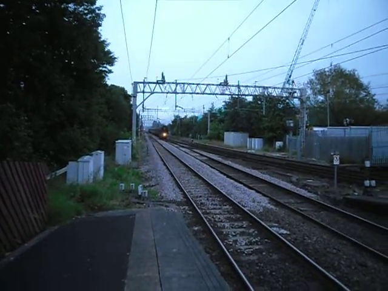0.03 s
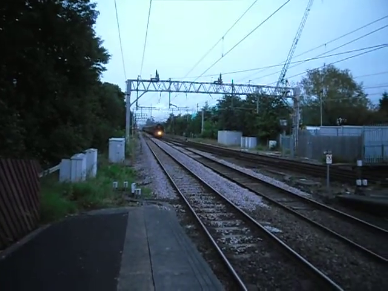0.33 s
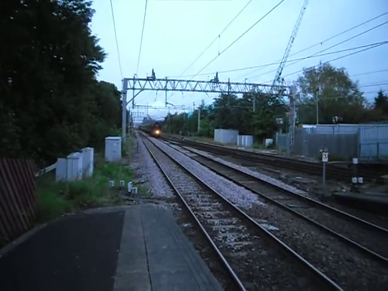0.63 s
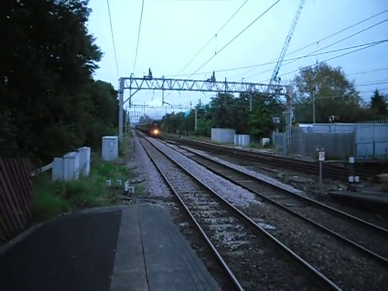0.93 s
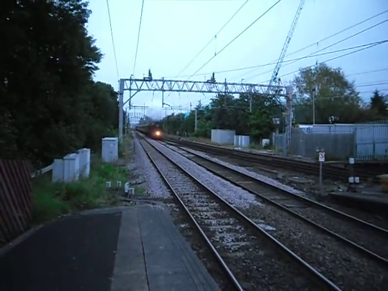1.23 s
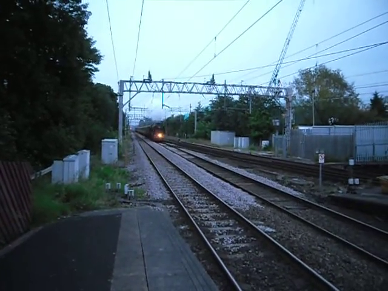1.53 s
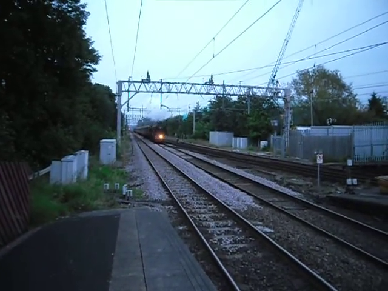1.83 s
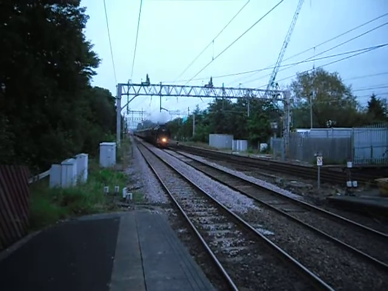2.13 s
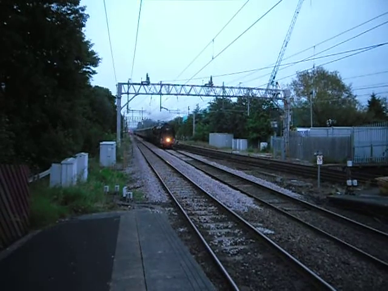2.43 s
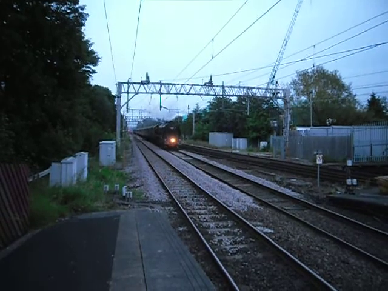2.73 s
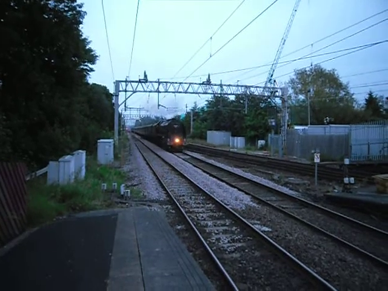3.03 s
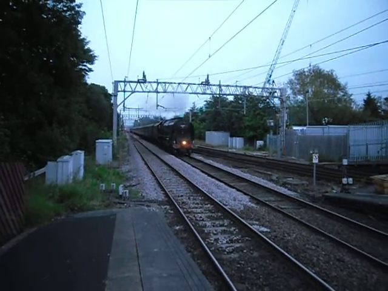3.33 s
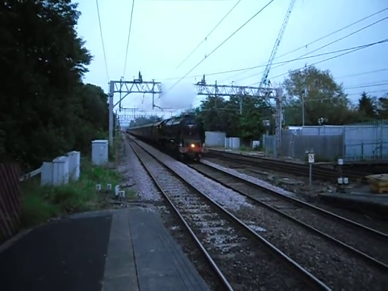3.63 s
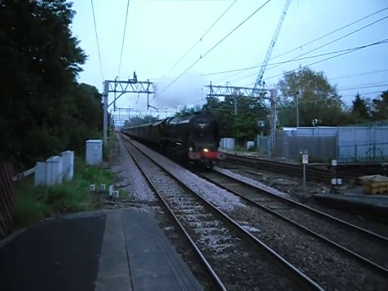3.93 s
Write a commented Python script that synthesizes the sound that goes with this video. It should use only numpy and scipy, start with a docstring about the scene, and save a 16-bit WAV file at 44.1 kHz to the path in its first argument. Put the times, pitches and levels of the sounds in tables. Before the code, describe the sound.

A steam train runs fast towards a microphone on a station platform. Rapid, thudding chuffs with spits of steam grow louder over rumbling wheels and rushing rails. A rail pings once, and two harder beats bark near the end.

```python
"""A steam locomotive runs fast towards a microphone on a station platform, beating twelve times a second.
Each exhaust beat is a push of air, a low thud, a chuff that rings in the chimney and smokebox, and a
spit of steam; trees and fences along the line scatter it into a short tail. Under the beats the wheels
rumble and the rails rush and sing, louder and brighter as the train closes in. A rail pings once,
and at close range two beats bark harder. A low rumble and a faint whine lie behind it all."""
import sys
import numpy as np
from scipy import signal
from scipy.fft import rfft, irfft, next_fast_len
from scipy.io import wavfile
from scipy.ndimage import uniform_filter1d, map_coordinates

SR = 44100
rng = np.random.default_rng(int(sys.argv[2]) if len(sys.argv) > 2 else 0)


def to_wav(sig):
    """Store sig (one row per channel, or 1-D mono) as 16-bit WAV at the path in sys.argv[1].

    Samples outside -1..1 are clipped; the rate is SR.
    """
    pcm = np.clip(np.atleast_2d(sig), -1, 1) * 32767
    pcm = np.round(pcm).astype(np.int16)
    wavfile.write(sys.argv[1], SR, pcm.T)  # frames by channels


N = 176400
TIME = np.arange(N) / SR


def amp(db):
    """Decibels to gain."""
    return 10 ** (np.asarray(db) / 20)


def unit(x):
    """Scale to rms 1."""
    return x / np.sqrt(np.mean(x ** 2) + 1e-20)


def along(points, hz):
    """Interpolate (frequency [Hz], value) points on a log axis."""
    f, v = np.transpose(points)
    return np.interp(np.log(hz + 1), np.log(f + 1), v)


def level(rows):
    """Gain per sample from (time [s], level [dB]) points."""
    return amp(np.interp(TIME, *np.transpose(rows)))


def wobble(rate):
    """A smooth random curve, rate knots a second."""
    return map_coordinates(rng.standard_normal(1024), [TIME * rate], mode="mirror")


def filtered(x, response):
    """Filter x by a complex response of frequency."""
    m = next_fast_len(N + SR // 2)
    return irfft(rfft(x, m) * response(np.fft.rfftfreq(m, 1 / SR)), m)[:N]


def noise(spectrum, patchy_db):
    """Coloured noise of rms 1 with patches of random gain."""
    z = signal.stft(rng.standard_normal(N), nperseg=1024)[2]
    patches = uniform_filter1d(uniform_filter1d(rng.standard_normal(z.shape), 3, 0), 12, 1)
    patched = signal.istft(z * amp(patchy_db * unit(patches)), nperseg=1024)[1][:N]
    return unit(filtered(patched, lambda hz: amp(along(spectrum, hz))))


def resonances(modes, hz):
    """Response of (frequency [Hz], width [Hz], gain [dB]) resonances."""
    return sum(amp(db) * 1j * hz * w / (c * c - hz * hz + 1j * hz * w) for c, w, db in modes)


def ringing(drive, modes, low_hz, high_hz):
    """Resonances excited by drive, through a steep band-pass, at rms 1."""
    def response(hz):
        band = hz ** 4 / (hz ** 4 + low_hz ** 4) / (1 + (hz / high_hz) ** 4)
        return resonances(modes, hz) * band
    return unit(filtered(drive, response))


def burst(t, attack_s, hold_s, decay_s):
    """Smooth rise, hold and exponential release."""
    rise = np.sin(np.pi / 2 * np.clip(t / attack_s, 0, 1)) ** 2
    return rise * np.exp(-np.maximum(t - attack_s - hold_s, 0) / decay_s)


# Ambience on the platform: (frequency [Hz], relative level [dB])
STATION_SPECTRUM = [(20, -0.5), (45, 1), (70, -1.5), (100, -23.5), (200, -42)]
def station_rumble(level_db=-37.5):
    """A soft, steady low rumble all around the microphone."""
    return amp(level_db) * noise(STATION_SPECTRUM, patchy_db=1)


# Tones far in the background: (frequency [Hz], level [dB])
WHINE_TONES = [(7867, -77), (8133, -79)]
def whine():
    """Two faint, steady high tones."""
    return sum(amp(db) * np.sqrt(2) * np.sin(2 * np.pi * hz * TIME) for hz, db in WHINE_TONES)


# Ring of a pinging rail: (frequency [Hz], width [Hz], gain [dB])
PING_MODES = [(1950, 74, 2), (2250, 80, -13), (2720, 240, 1)]
# The ping, heard from the platform: (time [s], level [dB])
RAIL_PINGS = [(1.871, -33)]
def rail_ping():
    """A rail pings once, brief and metallic."""
    steel = ringing(rng.standard_normal(N), PING_MODES, low_hz=1100, high_hz=3500)
    return steel * sum(amp(db) * burst(TIME - start, attack_s=.0067, hold_s=.013, decay_s=.0082)
                       for start, db in RAIL_PINGS)


# Rails ahead of the train: (frequency [Hz], width [Hz], gain [dB])
SONG_MODES = [(1535, 92, -2.5), (1900, 99, -11), (2350, 97, -4.5), (2655, 79, -4), (2940, 99, -6)]
# Their singing, heard from the platform: (time [s], level [dB])
SONG_LEVELS = [(0, -49), (.6, -45), (1.2, -43), (2, -42.5), (3, -36), (4, -46.5)]
def rail_song():
    """The rails ring in a few narrow bands under the wheels."""
    steel = ringing(rng.standard_normal(N), SONG_MODES, low_hz=1100, high_hz=3500)
    return level(SONG_LEVELS) * steel * amp(wobble(8.5))


# Rush of the rails: (frequency [Hz], relative level [dB])
RUSH_SPECTRUM = [(300, 5), (900, 6.5), (1300, -1.5), (1750, 0), (2200, -2), (2800, -3.5), (3600, -6.5),
                 (5000, -9), (6000, -13.5), (6700, -19), (7500, -19.5), (8100, -44.5), (8800, -59)]
# Its approach: (time [s], level [dB])
RUSH_LEVELS = [(0, -40), (.6, -39.5), (1.4, -37.5), (2.2, -34), (2.75, -33), (3.2, -26), (3.45, -27),
               (3.85, -25), (4, -24.5)]
def rail_rush(treble_hz=3600, brighten_db_per_s=.8):
    """The rails rush; the air swallows less treble as the distance to the microphone shrinks."""
    rush = level(RUSH_LEVELS) * noise(RUSH_SPECTRUM, patchy_db=.8) * amp(.7 * wobble(20))
    treble = filtered(rush, lambda hz: hz ** 4 / (hz ** 4 + treble_hz ** 4))
    treble_gain = amp(brighten_db_per_s * (TIME - N / SR / 2))
    return rush + treble * (treble_gain - 1)


# Roar of the track: (frequency [Hz], relative level [dB])
ROAR_SPECTRUM = [(120, -12), (250, 12), (330, 4.5), (480, 11), (560, 6.5), (750, 0.5), (950, 2.5),
                 (1300, -8.5), (2500, -68)]
# Hollow ring of wheels on track: (frequency [Hz], width [Hz], gain [dB])
HOLLOW_MODES = [(406, 10, -4), (467.6, 54, 7.5), (508, 48, -10.5)]
# Roar and hollow ring at the platform: (time [s], level [dB])
ROAR_LEVELS = [(0, -38.5), (1, -34.5), (2, -31), (2.7, -29), (3.1, -27), (3.5, -23), (4, -23)]
HOLLOW_LEVELS = [(0, -49.5), (2.2, -46), (2.9, -32), (3.35, -23), (3.7, -28.5), (4, -33.5)]
def track_roar():
    """The track roars under the wheels and rings hollow at close range."""
    roar = level(ROAR_LEVELS) * noise(ROAR_SPECTRUM, patchy_db=1.9) * amp(.71 * wobble(26))
    hollow = ringing(rng.standard_normal(N), HOLLOW_MODES, low_hz=300, high_hz=704)
    return roar + level(HOLLOW_LEVELS) * hollow


# Rumble of the wheels: (frequency [Hz], relative level [dB])
WHEEL_SPECTRUM = [(25, 2), (45, -0.5), (65, -4.5), (100, -9.5), (138, 3.5), (185, -2.5), (215, 0.5),
                  (250, 2.5), (325, -6.5), (600, -51)]
# From far to near: (time [s], level [dB])
WHEEL_LEVELS = [(0, -41), (.8, -37.5), (1.4, -42), (2.1, -33.5), (2.55, -25.5), (2.8, -26), (3.1, -21),
                (3.55, -19.5), (4, -23.5)]
def wheel_rumble():
    """Wheels roll on the rails with a low, unsteady rumble."""
    return level(WHEEL_LEVELS) * noise(WHEEL_SPECTRUM, patchy_db=2.95) * amp(.8 * wobble(7.3))


# Echo beside the line: (frequency [Hz], time to fall 60 dB [s])
LINESIDE_DECAY = [(200, 0.99), (2000, 0.75), (8000, 0.097)]
def lineside_echo(exhaust):
    """Trees and fences scatter the exhaust back to the microphone as a short tail."""
    hz, t, z = signal.stft(rng.standard_normal(SR // 2), SR, nperseg=256)
    decay = amp(-60 * t / along(LINESIDE_DECAY, hz)[:, None])
    tail = signal.istft(z * decay, SR, nperseg=256)[1]
    return signal.fftconvolve(exhaust, tail / np.linalg.norm(tail))[:N]


# The four beats in one turn of the wheels: (push accent [dB], chuff accent [dB])
TURN_ACCENTS = [(0.4, 0.17), (1, -1.2), (4, -1.55), (1.5, -0.4)]
PUSH_ACCENTS, CHUFF_ACCENTS = np.transpose(TURN_ACCENTS)
def beats(scatter_db, accents_db=0, first_s=.0175, spacing_s=.081856, quicken_s=9.57e-6):
    """One impulse per exhaust beat, quickening slightly; any accents repeat with the wheel turn."""
    k = np.arange(int(N / SR / spacing_s) + 1)
    times = first_s + spacing_s * k - quicken_s * k ** 2
    gains = amp(np.resize(accents_db, len(k)) + scatter_db * rng.standard_normal(len(k)))
    return np.bincount(np.round(times * SR).astype(int), gains, N)[:N]


def pulses(hits, delay_s, width_s):
    """Lay a bell-shaped pulse on every beat."""
    t = np.arange(-SR // 2, SR // 2 + 1) / SR
    return signal.fftconvolve(hits, np.exp(-.5 * ((t - delay_s) / width_s) ** 2), "same")


def puffs(hits, lead_s, attack_s, hold_s, decay_s):
    """Lay a burst of flow on every beat, opening lead_s ahead of it."""
    t = np.arange(-SR // 2, SR // 2 + 1) / SR
    return signal.fftconvolve(hits, burst(t + lead_s, attack_s, hold_s, decay_s), "same")


# Low body of a beat: (frequency [Hz], relative level [dB])
THUD_SPECTRUM = [(95, -24.5), (135, 4.5), (178, 13), (210, 0), (260, -34.5)]
# Its weight at the platform: (time [s], level [dB])
THUD_LEVELS = [(0, -53), (.6, -47), (1.3, -39), (1.65, -37), (2.2, -33), (2.65, -30.5), (3.05, -35),
               (3.55, -27), (4, -29)]
def thuds():
    """The low body of each beat fills out as the engine nears."""
    flow = puffs(beats(scatter_db=3), lead_s=.0051, attack_s=.013, hold_s=.01, decay_s=.032)
    return level(THUD_LEVELS) * unit(flow * noise(THUD_SPECTRUM, patchy_db=.8))


# Hiss of steam: (frequency [Hz], relative level [dB])
SPIT_SPECTRUM = [(400, -28), (1000, 1), (1550, 2), (1900, -0.5), (2700, 5), (3600, -4.5), (4750, -5),
                 (6300, -11.5), (7500, -29), (8700, -43)]
# From far to near: (time [s], level [dB])
SPIT_LEVELS = [(0, -47), (.5, -42.5), (1.5, -42.5), (2.5, -39), (3.2, -39), (4, -33.5)]
def steam_spit():
    """A spit of steam rides on each chuff."""
    flow = puffs(beats(scatter_db=1.4), lead_s=.0053, attack_s=.013, hold_s=.013, decay_s=.023)
    return level(SPIT_LEVELS) * unit(flow * noise(SPIT_SPECTRUM, patchy_db=2))


# Blast of a hard beat: (frequency [Hz], relative level [dB])
BARK_SPECTRUM = [(100, -3.5), (160, -28), (330, -1.5), (520, 6), (800, 4), (1150, -8), (1500, -20),
                 (2000, -6), (3000, -18.5), (5500, -19), (8500, -45.5)]
# Its metallic ring: (frequency [Hz], width [Hz], gain [dB])
BARK_RING_MODES = [(709, 45, 5), (1040, 170, -5.5), (1238, 47, -3), (1850, 120, -10)]
# The hard beats: (time [s], hold [s], level [dB])
HARD_BEATS = [(3.501, 0.031, -18.5), (3.841, .03, -22)]
def barks(ring_db=-2):
    """Two harder beats with a metallic ring when the engine is close to the microphone."""
    ring = ringing(rng.standard_normal(N), BARK_RING_MODES, low_hz=490, high_hz=2500)
    blast = noise(BARK_SPECTRUM, patchy_db=1)
    flow = sum(amp(db) * burst(TIME - start, attack_s=.016, hold_s=hold, decay_s=.017)
               for start, hold, db in HARD_BEATS)
    return (blast + amp(ring_db) * ring) * flow


# Push of air at the microphone: (time [s], level [dB])
PUSH_LEVELS = [(0, -27), (1, -27), (1.7, -27.5), (2.2, -21), (2.5, -23), (2.75, -25.5), (3.1, -20),
               (3.45, -19.5), (3.8, -15.5), (4, -10)]
def air_push(cut_hz=7, ring_hz=23.5, ring_width_hz=8.5, ring_gain=1.3):
    """Each beat's push of air, with a deep ring from the microphone's low cut."""
    hits = beats(scatter_db=3, accents_db=PUSH_ACCENTS)
    pressure = -pulses(hits, delay_s=-.0061, width_s=.0044)
    def microphone(hz):
        s = 1j * hz / cut_hz
        low_cut = s ** 3 / ((s + 1) * (s * s + s + 1))
        ring = resonances([(ring_hz, ring_width_hz, 0)], hz)
        return low_cut * (1 + ring_gain * ring)
    return level(PUSH_LEVELS) * unit(filtered(pressure, microphone))


# Chimney and smokebox: (frequency [Hz], width [Hz], gain [dB])
CHIMNEY_MODES = [(201.3, 20, -17.5), (252.2, 12.6, 6), (282.3, 11, -2.5), (366, 27, -8), (444.6, 54, -12)]
# Their ring, heard from the platform: (time [s], level [dB])
CHIMNEY_LEVELS = [(0, -31), (.5, -31), (1.2, -26.5), (1.45, -32), (1.65, -26), (1.95, -24.5), (2.25, -26.5),
                  (2.8, -31), (3.15, -25.5), (3.4, -24), (3.7, -20), (4, -18)]
def chimney_ring(kick_db=-6, draught=.088, jitter_s=.0012):
    """Each beat kicks the chimney and smokebox; the turbulent flow keeps them droning."""
    hits = beats(scatter_db=1, accents_db=CHUFF_ACCENTS)
    flow = draught + puffs(hits, lead_s=.013, attack_s=.014, hold_s=.022, decay_s=.012)
    # (frequency [Hz], relative level [dB])
    turbulence = [(60, -19), (110, -10.5), (170, 5.5), (500, 4.5), (900, -2.5), (2500, -29)]
    drive = flow * noise(turbulence, patchy_db=1.06)
    kicks = pulses(hits, delay_s=.01059, width_s=.0004)
    kicks = map_coordinates(kicks, [np.arange(N) + jitter_s * SR * wobble(12)], order=1)
    drone, knock = (ringing(x, CHIMNEY_MODES, low_hz=125, high_hz=900) for x in (drive, kicks))
    return level(CHIMNEY_LEVELS) * unit(drone + amp(kick_db) * knock)


# Blast from the chimney: (frequency [Hz], relative level [dB])
CHUFF_SPECTRUM = [(60, -24), (110, -11.5), (200, 9), (320, -6), (520, 0), (740, -6.5), (940, -3),
                  (1250, -24), (2000, -24), (4000, -60.5)]
# As the engine bears down on the platform: (time [s], relative level [dB])
CHUFF_LEVELS = [(0, -29), (.7, -25.5), (1.2, -27), (1.45, -27), (1.8, -26.5), (2.3, -23.5), (2.8, -19.5),
                (3.2, -28), (3.55, -20.5), (4, -19)]
def chuffs(gain_db=-5):
    """Bursts of turbulent steam leave the chimney."""
    hits = beats(scatter_db=1.56, accents_db=CHUFF_ACCENTS)
    flow = puffs(hits, lead_s=.0091, attack_s=.0087, hold_s=.026, decay_s=.013)
    return amp(gain_db) * level(CHUFF_LEVELS) * unit(flow * noise(CHUFF_SPECTRUM, patchy_db=1.4))


def scene(echo_db=-13):
    """From the platform: the exhaust and its echo over the rolling train and the station ambience."""
    exhaust = thuds() + chuffs() + chimney_ring() + steam_spit() + barks()
    engine = air_push() + exhaust + amp(echo_db) * lineside_echo(exhaust)
    rolling = wheel_rumble() + track_roar() + rail_rush() + rail_song() + rail_ping()
    return (engine + rolling + station_rumble() + whine())[None]


def record(dry, ceiling=.72, roll_off_hz=7960, top_hz=9000):
    """The camera rounds off the highest peaks and keeps nothing above its band limit."""
    rounded = dry[0] / (1 + np.abs(dry[0] / ceiling) ** 8) ** (1 / 8)
    return filtered(rounded, lambda hz: (hz < top_hz) / np.sqrt(1 + (hz / roll_off_hz) ** 40))[None]


dry = scene()
out = record(dry)
to_wav(out)
```